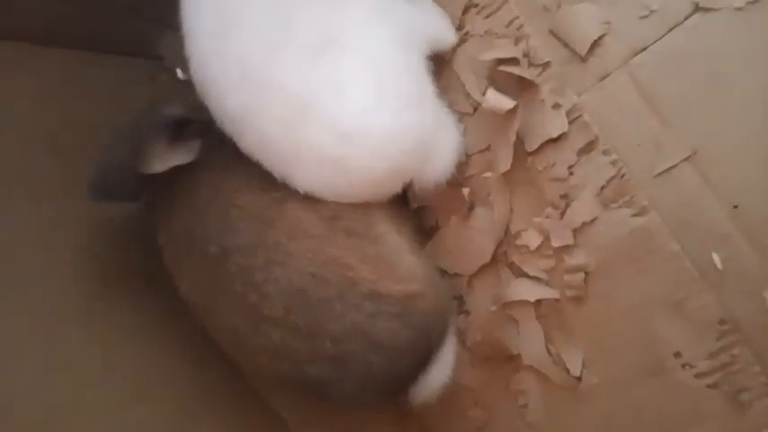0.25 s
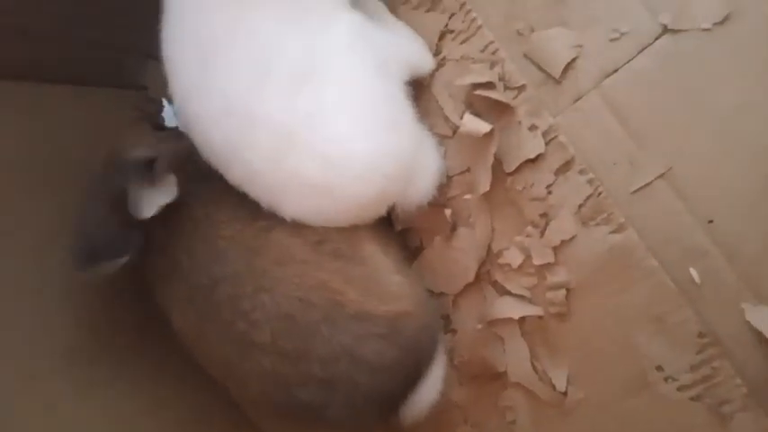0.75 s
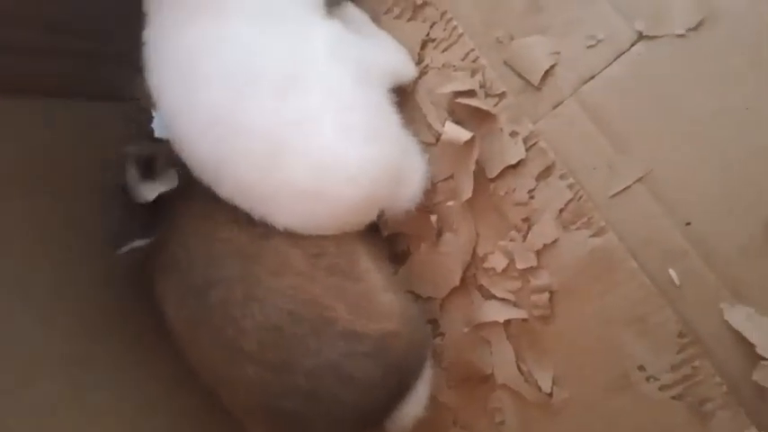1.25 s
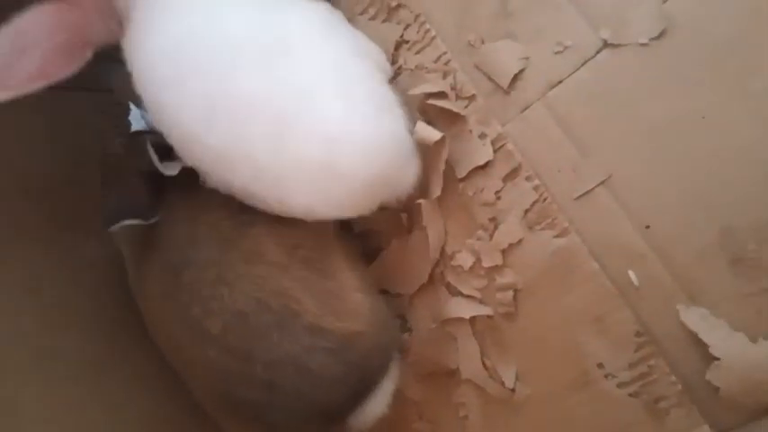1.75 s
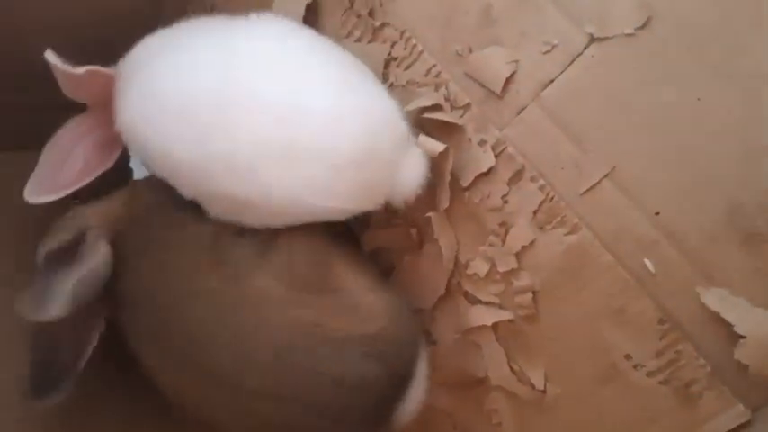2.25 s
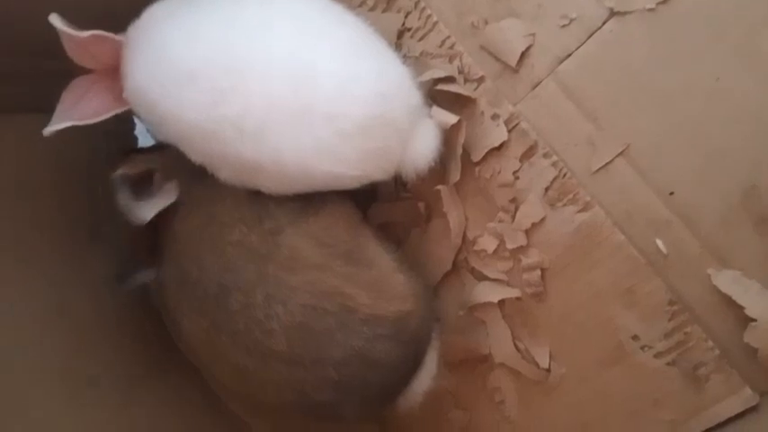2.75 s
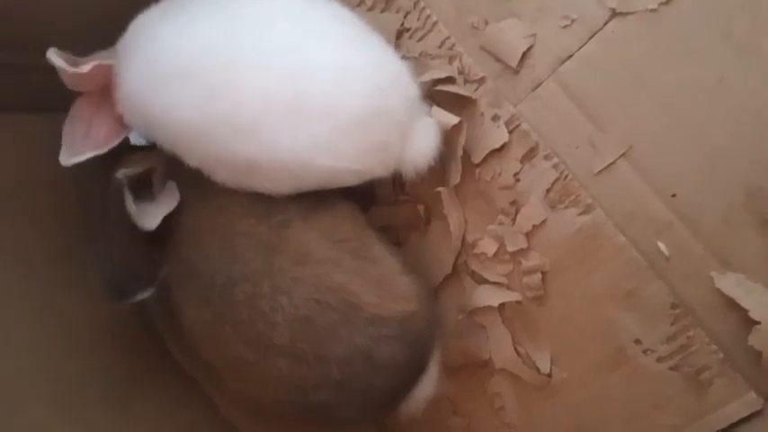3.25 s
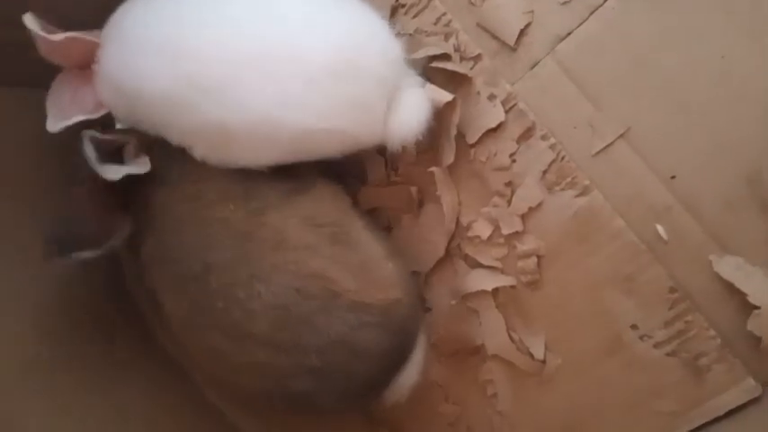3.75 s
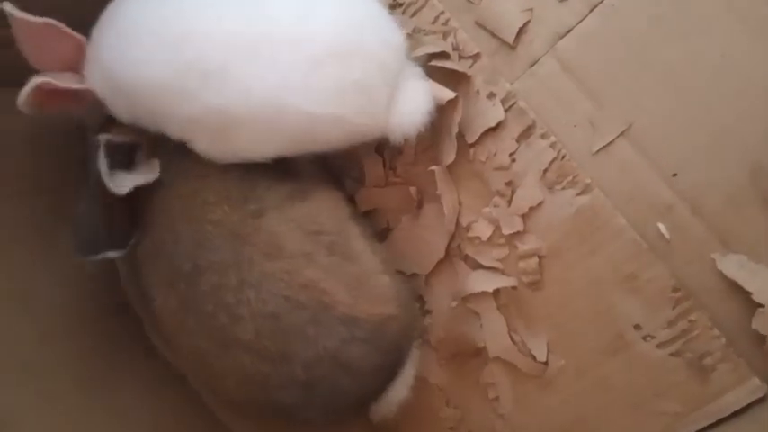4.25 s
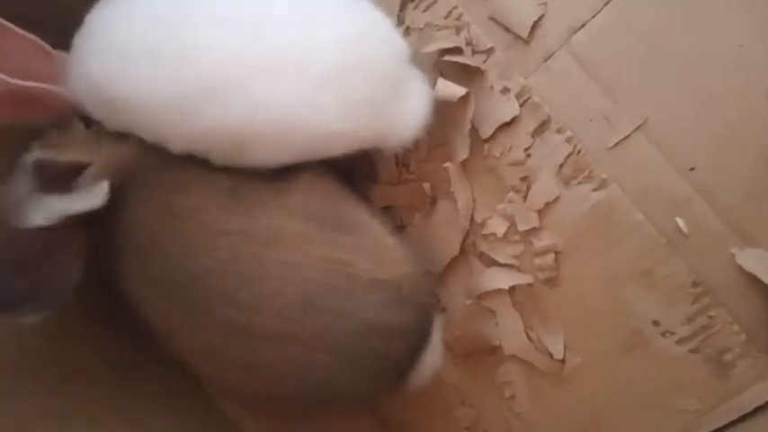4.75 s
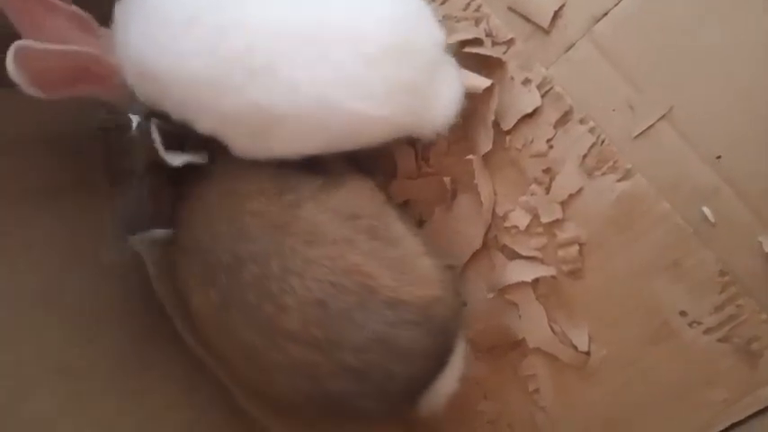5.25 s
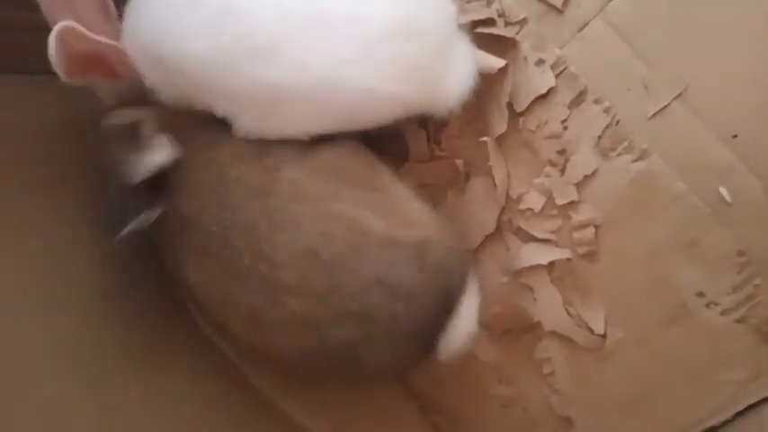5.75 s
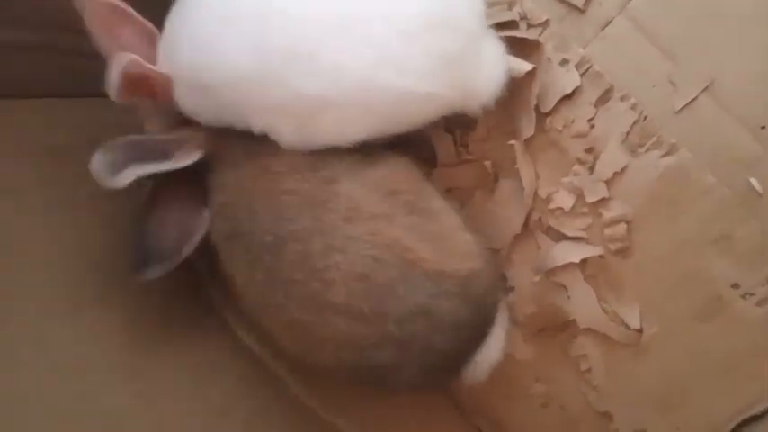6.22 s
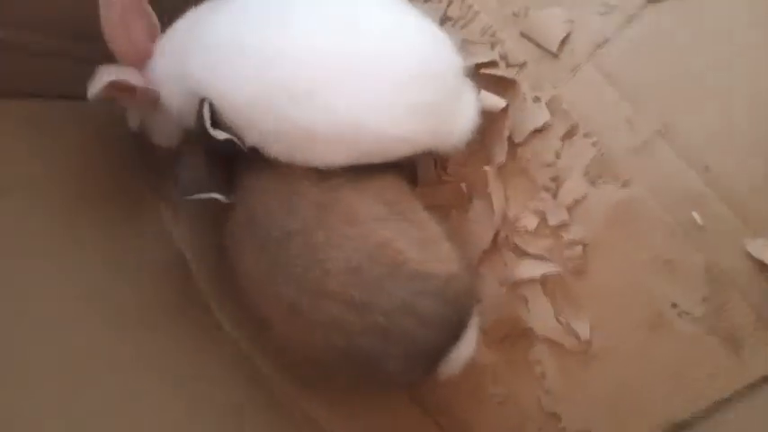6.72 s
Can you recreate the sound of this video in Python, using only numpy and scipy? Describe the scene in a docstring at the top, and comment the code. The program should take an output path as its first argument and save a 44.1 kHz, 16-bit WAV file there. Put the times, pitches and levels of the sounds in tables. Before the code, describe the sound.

Teeth rasp and rip dry cardboard in uneven bursts, strips snapping with boxy thumps; soft fur rustles, faint falling bird notes far away.

```python
"""Gnawing, close by: teeth rasp and tear at the wall of a cardboard box that holds two young rabbits.
When a strip lets go its fibres crack, the wall knocks back and the box booms; paws, fur and shreds stir.
Far outside a bird whistles falling notes; the room is quiet, with low rumble and thin hiss.
Teeth and fur are shaped noise and random fractures, wall and box are damped modes, the bird is gliding sines.
A small microphone takes it all in, thin in the deepest bass and cut steeply at the top."""
import sys
import numpy as np
from scipy import signal
from scipy.fft import rfft, irfft
from scipy.io import wavfile

SR = 44100
rng = np.random.default_rng(int(sys.argv[2]) if len(sys.argv) > 2 else 0)


def int16_out(signal):
    """Quantize to a 16-bit WAV file."""
    q = np.round(np.clip(np.atleast_2d(signal).T, -1, 1) * 32767)
    wavfile.write(sys.argv[1], SR, q.astype(np.int16))


N = 307818   # samples in the scene
T = np.arange(SR // 3) / SR   # time within one event, s


def from_db(db):
    """Decibels to gain."""
    return 10 ** (np.asarray(db) / 20)


def unit_energy(x):
    """Scale a response so that it passes white noise at the same power."""
    return x / np.sqrt(np.sum(x ** 2) + 1e-20)


def add(out, start_s, sound):
    """Mix a sound in at a time."""
    at = max(round(start_s * SR), 0)
    out[at:at + len(sound)] += sound[:max(N - at, 0)]


def through(x, response):
    """Pass a sound through an impulse response."""
    return signal.fftconvolve(x, response)[:len(x)]


def butter(x, order, hz, kind="low"):
    """Pass a sound through a Butterworth filter."""
    return signal.sosfilt(signal.butter(order, hz, kind, fs=SR, output="sos"), x)


def wander(per_s):
    """A random course through one event, turning so many times a second."""
    return np.interp(T * per_s, np.arange(1000), rng.standard_normal(size=1000))


def click(spectrum, uneven_db=0, size=4096):
    """The sharpest causal (minimum-phase) pulse with this spectrum, coloured a little by chance."""
    octave = np.log2(np.maximum(np.fft.rfftfreq(size, 1 / SR), 10))
    hz, level_db = np.transpose(spectrum)
    knots = np.linspace(octave[0], octave[-1], num=40)
    chance = np.interp(octave, knots, rng.standard_normal(len(knots)))
    colour_db = np.interp(octave, np.log2(hz), level_db) + uneven_db * chance
    # folding the cepstrum onto positive time gathers the energy at the start
    cepstrum = irfft(np.log(from_db(colour_db)))
    pulse = irfft(np.exp(rfft(2 * cepstrum[:size // 2], size)))
    return unit_energy(np.pad(pulse, (0, len(T) - size)))


def ring(modes, uneven_db):
    """Damped sines from rows of (hz, level_db, t60_s), struck with new strengths each time."""
    out = np.zeros(len(T))
    for hz, level_db, t60_s in modes:
        strength_db = level_db + uneven_db * rng.standard_normal()
        out += np.sin(2 * np.pi * hz * T) * from_db(strength_db - 60 * T / t60_s)
    return out


# Colour of the quiet room's air, before scaling to unit energy: hz [Hz], level_db [dB]
AIR_COLOUR = [(25, -21.5), (50, -5), (85, 2.5), (140, -7.5), (260, -17.5), (450, -22.5), (900, -27),
              (1600, -33.5), (4000, -39), (7500, -35.5), (9000, -45.5), (16000, -39)]


def room_air(level_db=-64.5):
    """Low rumble and thin hiss of the quiet house: steady noise through the colour of the air."""
    return from_db(level_db) * through(rng.standard_normal(N), click(AIR_COLOUR))


# Dry colour of breaking card, before scaling to unit energy: hz [Hz], level_db [dB]
FIBRE_COLOUR = [(300, -18.5), (900, 5.5), (1500, 2), (2200, 1), (3200, 4), (4300, 4.5), (5300, -3.5),
                (6600, -1), (7600, 3), (8800, -16), (10800, -2.5), (13000, -14), (15500, -18.5)]
REST_DB = -80.5   # motion of fur on the card while the animals sit still
RECOIL_DB, RECOIL_S = -68, .09   # motion relative to a bite's listed knock; time to settle


def litter(per_s=14, tick_db=-59, spread_db=4, rustle_db=-5, stir_db=4.5):
    """Fur brushes the card in uneven strokes, most around a hard bite, and loose shreds tick."""
    now = np.arange(N) / SR
    strokes = np.interp(now * 14, np.arange(100), rng.standard_normal(size=100))
    motion = np.full(N, from_db(REST_DB))
    for start_s, knock_db, *_ in BITES:
        # they brace before each bite and recoil after it
        motion += from_db(knock_db + RECOIL_DB) * np.exp(-np.abs(now - start_s) / RECOIL_S)
    brush = motion * from_db(rustle_db + stir_db * strokes) * rng.standard_normal(N)
    ticks = (rng.random(N) < per_s / SR) * from_db(tick_db + spread_db * rng.standard_normal(N))
    return through(brush + ticks, click(FIBRE_COLOUR))


def breaking_fibres(length_s, per_s=1100, spread_db=6, rub_db=-4, slips_per_s=260):
    """Tiny fractures over the rub of the teeth, clumped by stick and slip; unit power during the pull."""
    signs = rng.choice([-1, 1], len(T))
    sizes = signs * from_db(spread_db * np.clip(rng.standard_normal(len(T)), -2, 2))
    fractures = unit_energy(sizes * (rng.random(len(T)) < per_s / SR))
    rub = from_db(rub_db) * unit_energy(rng.standard_normal(len(T)))
    slip = from_db(4 * wander(slips_per_s))
    force = slip * (fractures + rub)
    return force / np.sqrt(np.mean(force[T < length_s + .03] ** 2))


def papery(force, tilt_db, shift_db=2.14):
    """Fractures take the dry colour of card; coarse and fine fibres give way in turn, so it keeps shifting."""
    spectrum = rfft(through(force, click(FIBRE_COLOUR)))
    octave = np.log2(np.maximum(np.fft.rfftfreq(len(T), 1 / SR), 10) / 4000)   # from 4 kHz
    centres = np.linspace(-2, 2, num=6)
    out = np.zeros(len(T))
    for centre, share in zip(centres, np.eye(len(centres))):
        # overlapping triangular bands, tilted in dB per octave
        band = irfft(spectrum * np.interp(octave, centres, share), len(T))
        out += band * from_db(tilt_db * centre + shift_db * wander(100))
    return out


# Bending modes of the gnawed wall: hz [Hz], level_db [dB, relative]
WALL_MODES = [(425, -5.5), (450, 4), (486, -5), (530, -6), (575, -1.5), (645, -14), (685, -13), (755, -11),
              (1050, -22), (1460, -25)]
WALL_T60_S = .14


def wall(spectrum, ring_db):
    """The wall answers a push with a dead knock and a ring, retuned each time by the animal leaning on it."""
    tension = 1 + .035 * rng.standard_normal()
    modes = ring([(hz * tension, db, WALL_T60_S) for hz, db in WALL_MODES], uneven_db=2.5)
    knock = click(spectrum, uneven_db=1.5)
    return unit_energy(knock + from_db(ring_db) * unit_energy(modes))


# Teeth scrape without freeing a strip: start_s [s], length_s [s], final level_db [dB, before the trims in tears],
# drive_db [dB, push on the wall relative to the fibres, before the same trims]
SCRAPES = [(0.025, 0.011, -55.5, -5.5), (1.412, 0.0045, -49, -8), (1.702, 0.029, -54.5, -18),
           (1.932, 0.033, -37, -4.5), (2.441, .013, -59, -24), (2.7, 0.072, -57, 2), (2.883, 0.047, -62, 3),
           (3.071, 0.0023, -33.5, -2), (3.159, 0.0067, -56, -3), (3.453, 0.073, -47, -17),
           (4.27, 0.013, -45, -7), (4.546, 0.016, -39.5, 13.5), (4.576, 0.037, -48, -11.5),
           (4.821, 0.0027, -54, -20), (5.003, 0.043, -60.5, -2), (5.198, 0.026, -61.5, 2.5),
           (5.343, .012, -58, 4), (5.596, 0.11, -57, -6), (6.005, 0.0079, -60.5, 4.5),
           (6.184, 0.017, -60.5, -4), (6.43, 0.052, -65, 13), (6.566, 0.064, -58, 10),
           (6.724, 0.0323, -39.5, 12), (6.869, 0.078, -42, 3), (6.937, 0.032, -58.5, 5)]
SCRAPE_SWELL_DB = 11   # the teeth dig in as they go
SCRAPE_TILT_DB = 0.5   # dB per octave at zero drive
DULLING = 0.33   # tilt lost for each dB of drive, as deeper teeth break coarser fibres
STRAIN_S, STRAIN_RISE_DB = .009, 13.5   # the card strains and creaks louder until it snaps
STRAIN_DB, STRAIN_DRIVE_DB = -17, 7   # final level relative to the listed crack; push on the wall
TEAR_FADE_DB, TEAR_DRIVE_DB = 5.5, 4   # a tear eases as it runs; its push on the wall
DRAG_S, DRAG_FADE_DB = .1, 10.5   # the freed strip drags
DRAG_DRIVE_DB = -39   # the drag's push on the wall, relative to the listed knock


def pulls():
    """A bite strains, tears and drags its strip; a scrape swells: start, length, first, last, drive, tilt."""
    for start_s, knock_db, crack_db, _, tear_db, length_s, tilt_db, drag_db in BITES:
        creak_db = crack_db + STRAIN_DB
        yield start_s - STRAIN_S, STRAIN_S, creak_db - STRAIN_RISE_DB, creak_db, STRAIN_DRIVE_DB, tilt_db
        yield start_s, length_s, tear_db, tear_db - TEAR_FADE_DB, TEAR_DRIVE_DB, tilt_db
        # drive counts from the drag's own level, so the push follows the knock
        drive_db = knock_db + DRAG_DRIVE_DB - drag_db
        yield start_s, DRAG_S, drag_db, drag_db - DRAG_FADE_DB, drive_db, tilt_db
    for start_s, length_s, level_db, drive_db in SCRAPES:
        tilt_db = SCRAPE_TILT_DB - DULLING * drive_db
        yield start_s, length_s, level_db - SCRAPE_SWELL_DB, level_db, drive_db, tilt_db


# How the wall sounds under rasping teeth, before scaling to unit energy: hz [Hz], level_db [dB]
RASP_COLOUR = [(30, -36), (70, -12), (150, 4.5), (260, -4.5), (470, -0.5), (650, -3.5), (900, -11),
               (1500, -18.5), (4000, -31)]


def tears(fibre_db=-5.5, wall_db=-1, bite_s=0.0018, release_s=0.0026, strain_db=-23, strain_s=0.0051):
    """Card creaks under strain, then tears; fractures sound directly and through the wall they shake."""
    out = np.zeros(N)
    lead_s = .025   # room for the force to build before the pull
    before = np.maximum(lead_s - T, 0)
    grip = np.maximum(np.exp(-before / bite_s), from_db(strain_db) * np.exp(-before / strain_s))
    for start_s, length_s, first_db, last_db, drive_db, tilt_db in pulls():
        pull = from_db(np.interp(T - lead_s, [0, length_s], [first_db, last_db]))
        release = np.exp(-np.maximum(T - lead_s - length_s, 0) / release_s)
        force = grip * pull * release * breaking_fibres(length_s)
        shaken = through(force, wall(RASP_COLOUR, ring_db=-8.5))
        add(out, start_s - lead_s, from_db(fibre_db) * papery(force, tilt_db))
        add(out, start_s - lead_s, from_db(wall_db + drive_db) * shaken)
    return out


# Slow swings of the whole box: hz [Hz], level_db [dB, relative], decay [times the boom's base decay]
BOX_MODES = [(59.5, -11.5, 1.3), (89.17, -5, 1.2), (127.7, 1.5, 0.89), (172, -4.5, 0.32),
             (200.4, -1.5, 0.34), (240, -2.5, 0.3), (366, -13.5, 0.24)]


def boom(t60_s, swell_s, tilt_db=0):
    """The whole box takes up the swing gradually; tilt in dB per octave favours its quicker swings."""
    main_hz = BOX_MODES[2][0]
    modes = [(hz, db + tilt_db * np.log2(hz / main_hz), share * t60_s) for hz, db, share in BOX_MODES]
    return ring(modes, uneven_db=1.5) * (1 - np.exp(-T / swell_s))


# Colour of the wall's knock, before scaling to unit energy: hz [Hz], level_db [dB]
KNOCK_COLOUR = [(30, -34), (60, -22), (110, -6.5), (190, 5.5), (300, -2), (480, 1.5), (700, -10),
                (1000, -23.5), (2000, -38.5), (5000, -57)]
# Bites that free a strip: start_s [s], knock_db, crack_db, boom_db, tear_db [dB, before the trims in snaps and tears],
# tear length_s [s], tear tilt_db [dB per octave], drag_db of the strip [dB, before the trims in tears]
BITES = [(0.154, -13, -34.5, -27.5, -47.5, 0.051, -2, -86), (0.324, -29, -28, -26, -33.5, 0.015, -3, -75),
         (0.627, -42.5, -34.5, -59, -32, 0.016, -3.5, -86), (0.647, -18, -41, -27.5, -32, 0.025, -1, -76),
         (0.739, -30, -57, -59, -38, 0.074, 0, -74), (0.815, -21.5, -35, -51.5, -35.5, .008, -3.5, -90),
         (1.825, -30, -49.5, -46, -44.5, 0.016, 7.5, -65), (2.07, -27, -50, -55.5, -36.5, 0.017, 5, -59.5),
         (2.203, 1, -25.5, -14, -46.5, .008, 4, -52), (3.015, -5.5, -29.5, -16, -29.5, .044, 3, -58),
         (3.576, -10, -55, -20.5, -29.5, 0.042, 3, -88), (4.322, -14, -28, -36.5, -40.5, 0.026, 4, -49.5),
         (4.461, -6, -18, -26.5, -27, 0.033, 0, -40.5), (4.662, -3.5, -22.5, -16, -24, 0.019, -3, -62.5),
         (5.679, -22, -28.5, -47, -44, 0.013, -8.5, -76.5), (5.779, -7.5, -24, -28.5, -38, .01, 1.5, -53),
         (6.76, -14, -37.5, -30, -39.5, 0.019, 2.5, -52)]


def snaps(knock_trim_db=14, crack_trim_db=17, boom_trim_db=5, lag_s=.0018, crack_s=.0019):
    """A strip lets go: the last fibres crack in a volley, then the wall knocks back and the box booms."""
    out = np.zeros(N)
    for start_s, knock_db, crack_db, boom_db, *_ in BITES:
        volley = unit_energy(rng.standard_normal(len(T)) * T * np.exp(-T / crack_s))
        knock = wall(KNOCK_COLOUR, ring_db=-12.0)
        swing = boom(t60_s=0.24, swell_s=0.0073, tilt_db=3)
        add(out, start_s, from_db(crack_db + crack_trim_db) * papery(volley, tilt_db=0))
        add(out, start_s + lag_s, from_db(knock_db + knock_trim_db) * knock)
        add(out, start_s + lag_s, from_db(boom_db + boom_trim_db) * swing)
    return out


def room_tail(t60_s, treble_t60_s, split_hz=1500, build_s=0.0021):
    """Diffuse reflections build up quickly and decay at separate rates below and above the split."""
    noise = rng.standard_normal(len(T))
    low = butter(noise, 1, split_hz)
    tail = low * from_db(-60 * T / t60_s) + (noise - low) * from_db(-60 * T / treble_t60_s)
    return unit_energy(butter(tail, 2, 220, "high") * (1 - np.exp(-T / build_s)))


# Fall of the whistles; low ones slide down faster: first pitch_hz [Hz], sag [octaves per s]
PITCH_SAG = [(1080, 2.3), (1160, 0.558)]
# Bird notes far outside: start_s [s], length_s [s], first pitch_hz [Hz, before the waver],
# level_db [dB, before the bird's trim]
BIRD_NOTES = [(0.823, 0.23, 902, -67), (1.315, 0.077, 1056, -59.5), (1.479, .12, 1047, -54),
              (2.37, 0.19, 1430, -73.5), (2.524, 0.13, 1158, -71), (3.068, 0.16, 867, -58.5),
              (3.673, 0.16, 1021, -55), (4.807, 0.082, 1312, -69.5), (5.999, 0.23, 901, -64),
              (6.507, 0.1, 1083, -60.5), (6.56, 0.085, 1194, -62.5), (6.67, 0.074, 1050, -56.5)]


def bird(trim_db=-3, bend=1.6, echo_db=1.0):
    """Wavering whistles that swell, sag in pitch and fade, blurred by distance."""
    out = np.zeros(N)
    for start_s, length_s, first_hz, level_db in BIRD_NOTES:
        sag = np.interp(first_hz, *np.transpose(PITCH_SAG))
        last_hz = first_hz * 2 ** (-length_s * sag)
        along = np.minimum(T / length_s, 1)
        waver = 1 + .018 * wander(140)
        flutter = from_db(2.5 * wander(70))
        hz = (first_hz + (last_hz - first_hz) * along ** bend) * waver
        swell = np.sqrt(np.abs(np.sin(np.pi * along))) * flutter
        whistle = np.sin(2 * np.pi * np.cumsum(hz) / SR)
        add(out, start_s, from_db(level_db + trim_db) * swell * whistle)
    return out + from_db(echo_db) * through(out, room_tail(t60_s=0.15, treble_t60_s=0.15))


# Muzzles and paws nudge the wall: start_s [s], peak level_db [dB, before the nudges' trim]
NUDGES = [(1.424, -62), (1.703, -48), (1.943, -39.5), (2.757, -60.5), (2.906, -43), (4.555, -37),
          (5.254, -52.5), (5.512, -59.5), (6.458, -45.5), (6.621, -49.5), (6.881, -41.5)]


def nudges(trim_db=7, press_s=0.003, ring_db=0):
    """A soft, skidding contact makes the wall answer with a hollow knock."""
    out = np.zeros(N)
    for start_s, level_db in NUDGES:
        skid = rng.standard_normal(len(T)) * T * np.exp(-T / press_s)
        hollow = butter(through(skid, wall(RASP_COLOUR, ring_db)), 2, [330, 750], "band")
        add(out, start_s, from_db(level_db + trim_db) * hollow / np.max(np.abs(hollow)))
    return out


# Soft paw steps on the box floor: start_s [s], level_db [dB, before the steps' trim]
PAW_STEPS = [(1.929, -41), (1.988, -35.5), (2.059, -40.5), (2.113, -24.5), (2.801, -41.5), (2.894, -30.5),
             (4.563, -33.5), (5.783, -17)]


def paws(trim_db=2):
    """Furry feet stir mainly the slow swings of the box."""
    out = np.zeros(N)
    for start_s, level_db in PAW_STEPS:
        add(out, start_s, from_db(level_db + trim_db) * boom(t60_s=.2, swell_s=.008))
    return butter(out + 1e-18, 2, 115)


# Reflections between the box walls: delay_s [s], level_db [dB relative to the direct sound above the bass]
BOX_ECHOES = [(.0031, -21), (.0058, -26), (.0079, -19), (0.0128, -22.5)]


def box_and_room(x, scatter_db=-8, room_db=-15):
    """Thin card reflects all but the bass; the room adds a short tail."""
    bright = butter(x + 1e-18, 1, 250, "high")
    out = x.copy()
    for delay_s, level_db in BOX_ECHOES:
        add(out, delay_s, from_db(level_db) * bright)
    scatter = from_db(scatter_db) * room_tail(t60_s=0.049, treble_t60_s=0.018, build_s=0.0045)
    room = from_db(room_db) * room_tail(t60_s=.23, treble_t60_s=0.17)
    return out + through(x, scatter + room)


def scene():
    """The rabbits in their box, the bird outside, the still room."""
    rabbits = litter() + tears() + snaps() + nudges() + paws()
    return (room_air() + box_and_room(rabbits) + bird())[None]


def record(dry):
    """The small microphone loses the deepest bass; the top is cut steeply."""
    thinned = butter(dry, 2, 40, "high")
    steep = signal.ellip(10, .1, 80, 15800, fs=SR, output="sos")   # 0.1 dB ripple, 80 dB stop, 15.8 kHz
    return signal.sosfilt(steep, thinned)


dry = scene()
out = record(dry)
int16_out(out)
```